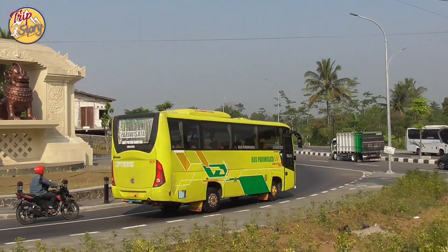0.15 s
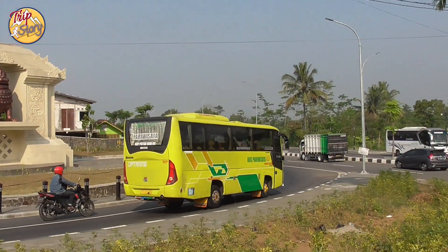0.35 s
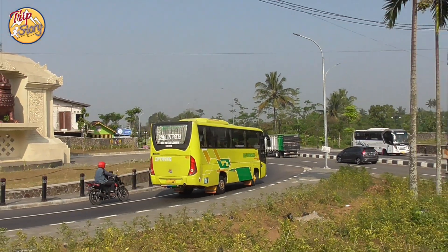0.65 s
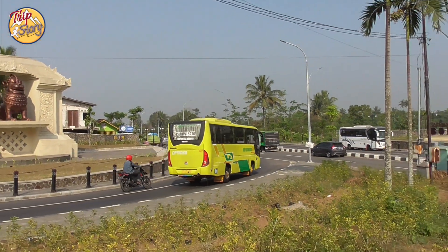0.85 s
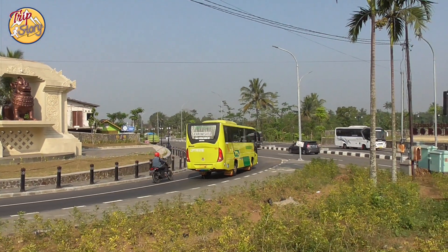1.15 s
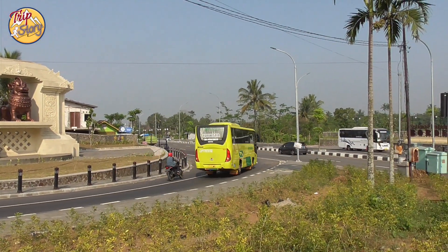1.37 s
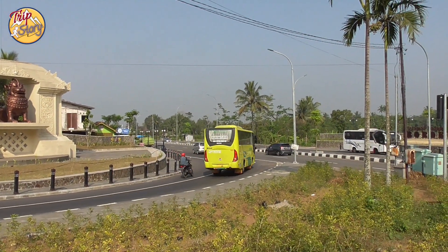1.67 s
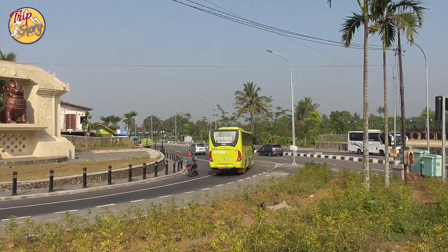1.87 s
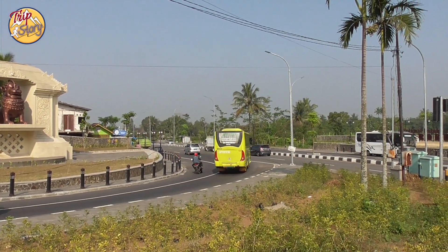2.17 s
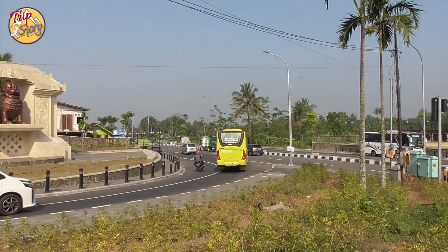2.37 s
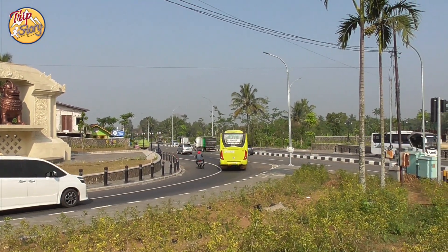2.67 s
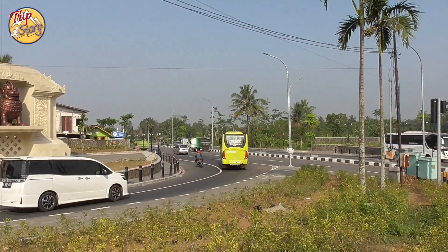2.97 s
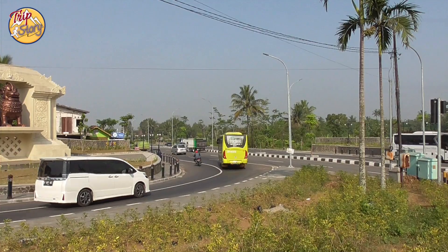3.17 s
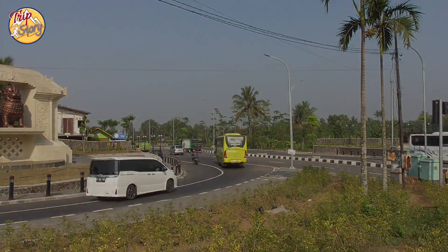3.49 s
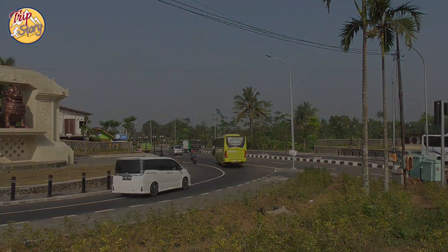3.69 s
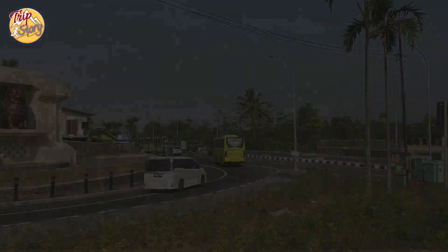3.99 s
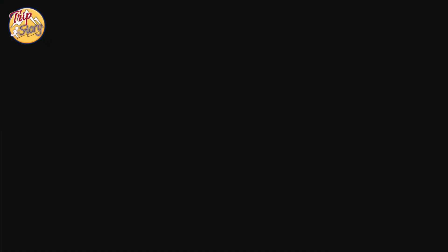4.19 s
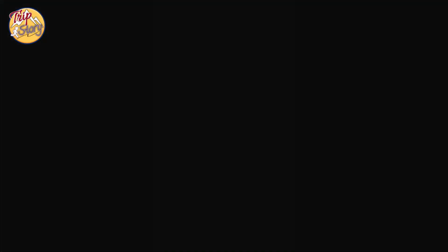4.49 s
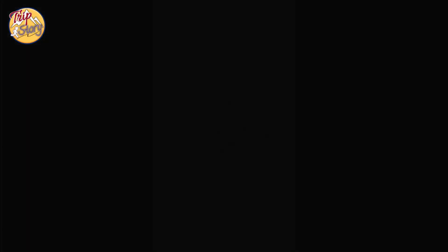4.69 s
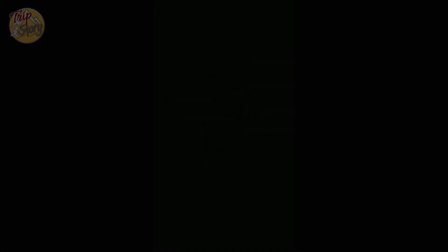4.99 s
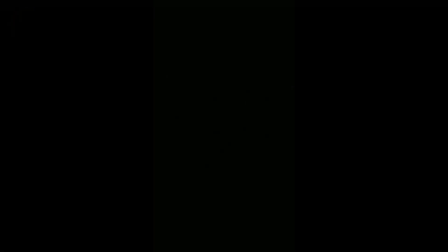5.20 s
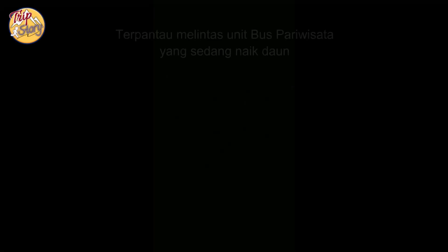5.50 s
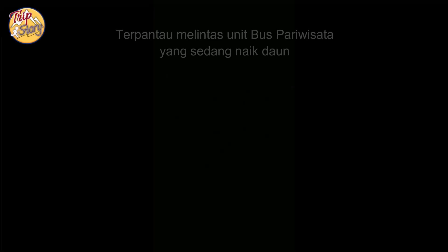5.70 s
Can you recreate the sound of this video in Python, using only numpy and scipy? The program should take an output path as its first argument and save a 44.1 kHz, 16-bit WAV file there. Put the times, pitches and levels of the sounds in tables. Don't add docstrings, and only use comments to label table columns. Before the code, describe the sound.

Thick, bass-heavy traffic noise surrounds a departing bus whose engine drone and whining gears recede. A motorcycle clatters behind it, loose metal tinkles on the left, and overlapping exhausts swell and die. A van rolls by midway; another engine rises in pitch with airy, fluttering turbo hiss, and a further vehicle approaches as the sound fades quickly. Open-air roadside, small camera microphone, limited treble.

```python
import sys
import numpy as np
from scipy import signal
from scipy.fft import rfft, irfft, next_fast_len
from scipy.io import wavfile
from scipy.ndimage import uniform_filter1d, map_coordinates

SR = 44100
rng = np.random.default_rng(int(sys.argv[2]) if len(sys.argv) > 2 else 0)


def wrap_up_sound(samples):
    columns = np.atleast_2d(samples).T
    tamed = np.clip(columns, -1, 1)
    steps = np.round(tamed * 32767).astype(np.int16)
    wavfile.write(sys.argv[1], SR, steps)


def voltage_ratio(level):
    return 10 ** (np.asarray(level, float) / 20)


N = 257981
TIME_S = np.arange(N) / SR


def unit(x):
    return x / np.sqrt(np.mean(x ** 2) + 1e-20)


def along(points, hz):
    f, v = np.transpose(points)
    return np.interp(np.log(hz + 1), np.log(f + 1), v)


def curves(rows):
    s, *cols = np.transpose(rows)
    return [np.interp(TIME_S, s, c) for c in cols]


def sounding(rows, edge_s=0.086):
    start_s, end_s = rows[0][0], rows[-1][0]
    return np.interp(TIME_S, [start_s - edge_s, start_s, end_s, end_s + edge_s], [0, 1, 1, 0])


def wobble(rate_hz, count=N):
    coarse = np.arange(0, count + 32, 32)
    knots = rng.standard_normal(int(count * rate_hz / SR) + 4)
    smooth = map_coordinates(knots, [coarse * rate_hz / SR])
    return np.interp(np.arange(count), coarse, smooth)


def filtered(x, response):
    m = next_fast_len(N + 8192)
    return irfft(rfft(x, m) * response(np.fft.rfftfreq(m, 1 / SR)), m)[..., :N]


def panned(db):
    return voltage_ratio(np.outer([.5, -.5], db))


def left_late(x):
    return np.array([np.roll(x, shift=2), x])


# (frequency [Hz], correlation [-])
ALIKE = [(60, 0.97), (130, 1), (290, 0.89), (640, 0.74), (1410, 0.33), (3100, 0.4), (6000, 0.16),
         (8500, 0.083), (11000, 0.3), (15000, .7)]
# (frequency [Hz], left lead [rad])
LEAD = [(600, .1), (1200, -.3), (3800, -.1), (6500, -.6), (8600, -3), (10900, -6.1), (15000, -6.2)]


def rush(spectrum, patchy_db, gate=1):
    z = signal.stft(rng.standard_normal((2, N)), nperseg=512)[2]
    field = uniform_filter1d(rng.standard_normal(z.shape[1:]), size=5, axis=0)
    field = uniform_filter1d(field, size=10, axis=1)
    patchy = signal.istft(z * voltage_ratio(patchy_db * unit(field)), nperseg=512)[1][:, :N]
    mid, side = gate * patchy

    def half_angle(hz):
        return np.arccos(np.clip(along(ALIKE, hz), -1, 1)) / 2

    def ports(hz):
        return voltage_ratio(along(spectrum, hz)) * np.exp(np.outer([.5j, -.5j], along(LEAD, hz)))

    mid = filtered(mid, lambda hz: ports(hz) * np.cos(half_angle(hz)))
    side = filtered(side, lambda hz: ports(hz) * np.sin(half_angle(hz)))
    return unit(mid + side * [[1], [-1]])


def tones(rows, orders, drift, flutter_db, rate_hz):
    hz, db = curves(rows)
    turns = np.cumsum(hz) / SR
    gain = np.sqrt(2) * voltage_ratio(db) * sounding(rows)
    on = np.flatnonzero(gain)
    total = np.zeros(len(on))
    for k, level_db in orders:
        strength = voltage_ratio(level_db + flutter_db * wobble(rate_hz, len(on)))
        cycles = k * turns[on] + drift * np.sqrt(k) * wobble(rate_hz, len(on))
        total += strength * np.sin(2 * np.pi * cycles)
    gain[on] *= total
    return gain, turns


def swell(s, length_s, first_hz, last_hz, db):
    share = np.array([0, .29, 1 - .29, 1])
    level_db = db - 13 * np.array([1, 0, 0, 1])
    return np.transpose([s + length_s * share, first_hz + (last_hz - first_hz) * share, level_db])


# (time [s], firing rate [Hz], level [dB])
COACH = [
    (0, 59.5, -36.5),
    (1, 59.08, -41.5),
    (1.5, 58.74, -44),
    (2.1, 58.7, -31.5),
]
# (multiple of firing [-], level [dB])
COACH_ORDERS = [(1, -5), (1.5, -3), (2, -1), (3, 6), (4, -4), (5, -3)]


def coach_engine():
    exhaust, turns = tones(COACH, COACH_ORDERS, drift=.05, flutter_db=2, rate_hz=8)
    return exhaust, 0.47 * sounding(COACH) * np.cos(2 * np.pi * turns)


# (start [s], length [s], first pitch [Hz], last pitch [Hz], peak level [dB])
DRONES = [(1.85, .4, 166, 165, -34), (1.4, .9, 195, 196, -33), (2.4, .5, 254, 252, -29),
          (2.75, .8, 276, 266, -33), (-.2, .8, 210, 243, -31), (4.05, .6, 144, 160, -26),
          (.8, 1.2, 78, 78, -40), (.6, .7, 126, 140, -37), (.9, .85, 288, 198, -29),
          (.95, .65, 315, 262, -30), (1.7, .35, 225, 222, -31), (2.9, .45, 114, 114, -32),
          (3.35, .9, 116, 142, -30), (4.3, .8, 132, 123, -34)]


def exhaust_drones():
    return sum(tones(swell(*row), [(1, 0)], drift=.07, flutter_db=2.5, rate_hz=11)[0] for row in DRONES)


def fuzzy_line(rows):
    return left_late(tones(rows, [(1, 0)], drift=.1, flutter_db=2.6, rate_hz=22)[0])


# (time [s], mesh rate [Hz], level [dB])
GEAR = [(0, 590, -32), (.3, 592, -38), (.75, 602, -30), (1.2, 592, -32), (1.5, 578, -31), (1.7, 588, -34),
        (1.95, 573, -29), (2.2, 605, -37), (2.4, 622, -29), (2.62, 672, -27), (2.85, 690, -37),
        (3.05, 722, -34), (3.35, 745, -32), (3.55, 750, -42)]


def gear_whine():
    return fuzzy_line(GEAR)


# (time [s], level [dB])
TRAFFIC = [(0, 3), (.4, 1), (.9, 2.5), (1.25, 1.5), (1.7, -1.5), (2.3, -2), (2.8, -0.1), (3.3, 0.4),
           (3.8, 1.1), (4.3, 1.3), (4.55, -2.5), (4.9, 1.3), (5.22, 3)]
# (time [s], left minus right [dB])
PAN = [(0, 1.6), (.8, 3), (1.3, 0), (2.3, -3.5), (3.2, -3), (3.94, -2.5), (5.2, 0)]
# (level [dB], growth with traffic [dB/dB], loss as the coach leaves [dB])
LAYERS = [
    (-20, 1.07, -0.2),
    (-24.5, 0.3, 1.16),
    (-41, 0.23, 2),
    (-53, 0.5, 3),
]
# (frequency [Hz], density [dB per Hz])
RUMBLE = [(13, -59.5), (22, -23.5), (40, -27), (56, -4.5), (97, -4), (169, 2), (302, 1.5), (336, 0),
          (415, -4), (462, -8.5), (520, -11.5), (680, -40), (1140, -120)]
ROAR = [(250, -27.5), (420, -3.5), (470, -7), (527, -4), (587, -3), (677, -2.5), (830, -7), (1330, -14),
        (1520, -16), (1750, -32), (2280, -55.5), (3850, -120)]
CLATTER = [(940, -16), (1600, -4.5), (1810, -6), (2080, -2.5), (2780, -10.5), (3750, -10), (5750, -17.5),
           (6500, -47.5), (8450, -43.5), (14300, -120)]
HISS = [(3410, -38.5), (5800, -1), (10200, -0.5), (13100, -14), (15500, -22)]


def road(beat):
    coach_gone_s, bass_pan_share = 3, 0.36
    traffic_db, = curves(TRAFFIC)
    near = 1 - np.minimum(TIME_S / coach_gone_s, 1)
    rumble_db, roar_db, clatter_db, hiss_db = [db + grows * traffic_db + lost_db * near
                                               for db, grows, lost_db in LAYERS]
    pan_db, = curves(PAN)
    surge = wobble(9) + 0.083 * wobble(35)
    rumble = voltage_ratio(rumble_db - 1.5 + .45 * surge) * rush(RUMBLE, patchy_db=1.1, gate=1 + .15 * beat)
    roar = voltage_ratio(roar_db + 0.45 * surge) * rush(ROAR, patchy_db=0.82, gate=1 + .15 * beat)
    clatter = voltage_ratio(clatter_db + 0.42 * surge) * rush(CLATTER, patchy_db=0.63, gate=1 + 0.071 * beat)
    hiss = voltage_ratio(hiss_db + 4) * rush(HISS, patchy_db=1.4)
    return panned(bass_pan_share * pan_db) * (rumble + roar) + panned(pan_db) * clatter + hiss


# (time [s], level [dB])
BIKE = [
    (0, -56.5),
    (.3, -50),
    (.98, -45),
    (1.4, -60.5),
    (1.7, -74.5),
]
# (frequency [Hz], density [dB per Hz])
RATTLE = [(1900, -30.5), (2700, -1), (3600, -1), (4600, 0), (5400, -12), (7000, -42)]


def motorcycle():
    firing_hz = 39.2
    firing = np.cos(2 * np.pi * (firing_hz * TIME_S + 0.24 * wobble(4.6)))
    level_db, = curves(BIKE)
    return voltage_ratio(level_db) * sounding(BIKE) * rush(RATTLE, patchy_db=-1.5, gate=1 + 0.24 * firing)


# (start [s], length [s], first pitch [Hz], last pitch [Hz], peak level [dB])
WHINES = [
    (0.247, 0.68, 670, 652.6, -31.5),
    (2, 0.52, 660, 704, -35),
    (3.702, .7, 414.4, 400, -31),
    (4.454, .45, 754, 775, -32.5),
]


def tread_whines():
    return sum(fuzzy_line(swell(*row)) for row in WHINES)


# (time [s], peak level [dB], pitch [Hz], sounding time [s])
JINGLES = [(1.104, -44, 10510, 0.036), (1.108, -50, 8300, .012), (1.142, -52, 8100, .012),
           (1.163, -44, 10500, 0.012), (1.216, -48.5, 7960, .012), (1.255, -56, 9500, .01),
           (1.298, -54, 10400, .012), (1.395, -55, 10400, 0.018), (1.42, -46, 8750, .012),
           (1.428, -44, 9290, 0.032), (1.525, -50.5, 9340, .012), (1.675, -51.5, 10400, .02),
           (1.955, -49, 10420, .03), (2.015, -50.5, 10400, .03)]


def jingles():
    overtone_above_hz, overtone_db = 3860, -22
    out = np.zeros(N)
    for s, db, hz, life_s in JINGLES:
        t = np.arange(int(life_s * SR)) / SR
        ring = np.sin(2 * np.pi * hz * t)
        ring += voltage_ratio(overtone_db) * np.sin(2 * np.pi * (hz + overtone_above_hz) * t)
        out[round(s * SR):][:len(t)] += voltage_ratio(db) * ring * np.sin(np.pi * t / life_s) ** .4
    return np.array([voltage_ratio(10.0) * out, voltage_ratio(-1.5) * np.roll(out, shift=2)])


# (time [s], level [dB], main band [Hz])
TURBO = [(1.5, -58.5, 7480), (1.8, -51.5, 7480), (2.05, -46, 7640), (2.6, -45, 7690), (2.95, -41.5, 7785),
         (3.25, -43, 7630), (3.6, -44.5, 7590), (3.94, -41, 7660), (4.12, -38, 7480), (4.3, -37, 7584),
         (4.47, -32.5, 7575), (4.66, -36.5, 7650), (4.79, -35, 7690), (5.25, -37, 7785)]
# (centre [Hz], width [Hz], level [dB])
TURBO_TOP = [
    (8500, 900, -18),
    (11560, 460, -27),
]


def resonance(air, centre_hz, width_hz):
    return unit(filtered(air, lambda hz: 1 / (1 + (2 * (hz - centre_hz) / width_hz) ** 2)))


def turbo():
    soft_db, hard_db = -44, -31
    puff_hz, loudest_puff_s = 64.85, 4.4695
    main_width_hz, lower_hz, lower_width_hz = 540, 7010, 450
    surge_s, surge_width_s, surge_db = 3.9, .35, 7
    aside_db, aside_echo = -42.5, 0.94

    db, hz = curves(TURBO)
    lower_db = np.interp(db, [soft_db, hard_db], [-8, -14])
    depth = np.interp(db, [soft_db, hard_db], [.15, .85])
    cycle = 2 * np.pi * (puff_hz * (TIME_S - loudest_puff_s) + 0.066 * wobble(4))
    puffs = voltage_ratio(depth * (3.0 * np.cos(cycle) + 1.7 * np.cos(2 * cycle)) + 0.98 * wobble(14))

    near, far, left, right = rng.standard_normal((4, N))
    aside = left_late(far) + aside_echo * np.array([left, right])
    share = np.minimum(voltage_ratio(aside_db - db), 1)
    air = np.sqrt(1 - share ** 2) * near + share * unit(aside)

    main = signal.hilbert(resonance(air, hz.mean(), main_width_hz), next_fast_len(N))[:, :N]
    main = np.real(main * np.exp(2j * np.pi * np.cumsum(hz - hz.mean()) / SR))
    lower_db = lower_db + surge_db * np.exp(-((TIME_S - surge_s) / surge_width_s) ** 2)
    lower = voltage_ratio(lower_db + 1.2 * wobble(6.6)) * resonance(air, lower_hz, lower_width_hz)
    top = sum(voltage_ratio(level_db) * resonance(air, c_hz, w_hz) for c_hz, w_hz, level_db in TURBO_TOP)
    return voltage_ratio(db) * sounding(TURBO) * unit(puffs) * (main + lower + top) * voltage_ratio([[.6], [-.6]])


# (time [s], firing rate [Hz], level [dB])
CLIMB = [(2.05, 50.56, -49), (2.45, 51.32, -40), (2.8, 53.27, -36.5), (3.18, 57.5, -38),
         (3.91, 66.5, -36.5), (4.5, 74.02, -39), (4.86, 78.84, -37), (5.25, 81.3, -36.5)]
# (multiple of firing [-], level [dB])
CLIMB_ORDERS = [(1, 5), (2, -2), (3, 4), (4, 3.5), (5, -13.5), (6, -21.5), (7, -21)]


def climbing_engine():
    exhaust, turns = tones(CLIMB, CLIMB_ORDERS, drift=.05, flutter_db=1.5, rate_hz=11)
    return exhaust, sounding(CLIMB) * np.cos(2 * np.pi * turns)


# (time [s], level [dB])
ARRIVAL = [
    (4.3, -62),
    (4.6, -36),
    (4.85, -28.5),
    (5.23, -26),
]
# (frequency [Hz], density [dB per Hz])
SPRAY = [(600, -37), (900, 1), (1350, 4.5), (1700, -9), (2200, -8), (4000, -21), (7000, -22.5),
         (9500, -22.5), (12500, -29.5), (15600, -43.5)]


def van_and_arrival():
    closest_s, passing_s, van_db = 3, 0.53, -38
    van = voltage_ratio(van_db) / (1 + ((TIME_S - closest_s) / passing_s) ** 2)
    nearing = voltage_ratio(curves(ARRIVAL)[0]) * sounding(ARRIVAL)
    return np.hypot(van, nearing) * rush(SPRAY, patchy_db=1.8)


def scene():
    coach, coach_beat = coach_engine()
    climb, climb_beat = climbing_engine()
    exhaust = (coach + exhaust_drones() + climb) * voltage_ratio([[-.3], [.3]])
    steady = exhaust + gear_whine() + road(coach_beat + climb_beat)
    return steady + motorcycle() + tread_whines() + jingles() + turbo() + van_and_arrival()


def roll_off(x):
    return signal.sosfilt(signal.butter(12, 15620, fs=SR, output="sos"), x)


# (time [s], gain [-])
FADE = [
    (4.75, 1),
    (5.222, .025),
    (5.224, 0),
]


def record(dry):
    low_cut_hz = 46
    heard = filtered(dry, lambda hz: 1 / np.sqrt(1 + (low_cut_hz / (hz + 1)) ** 4))
    return roll_off(heard * curves(FADE)[0])


dry = scene()
out = record(dry)
wrap_up_sound(out)
```